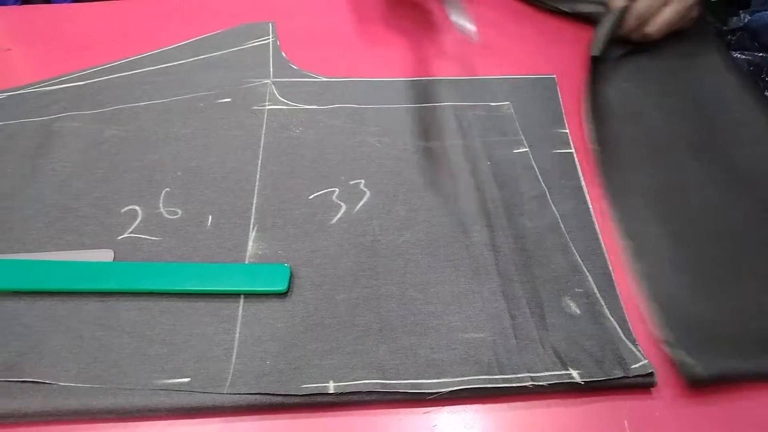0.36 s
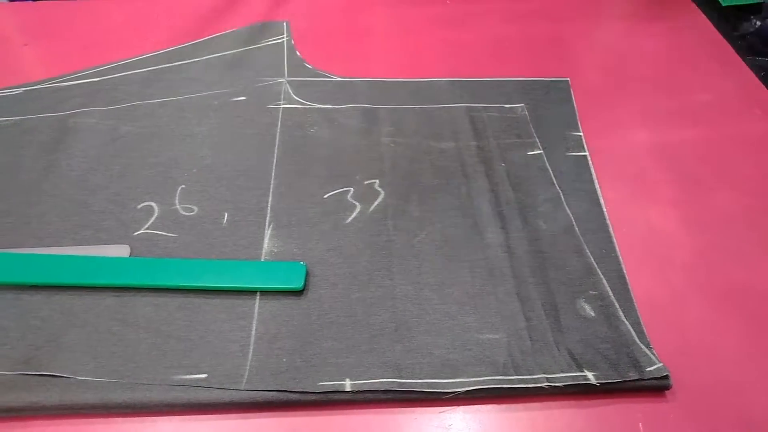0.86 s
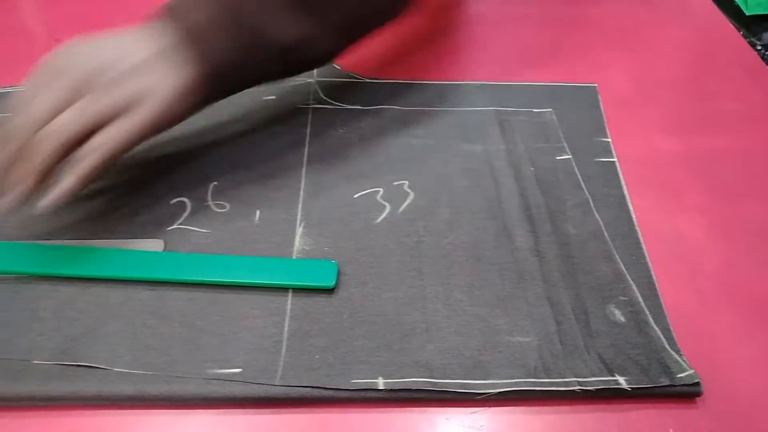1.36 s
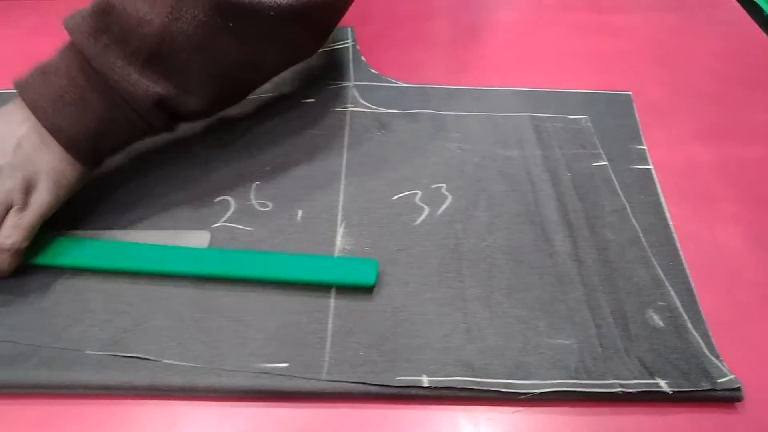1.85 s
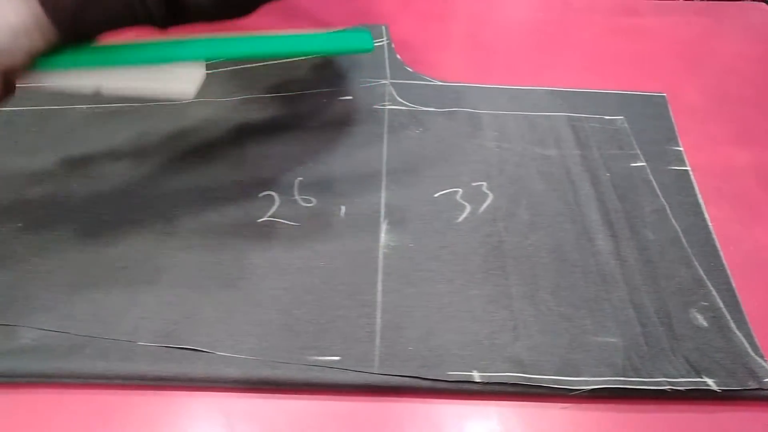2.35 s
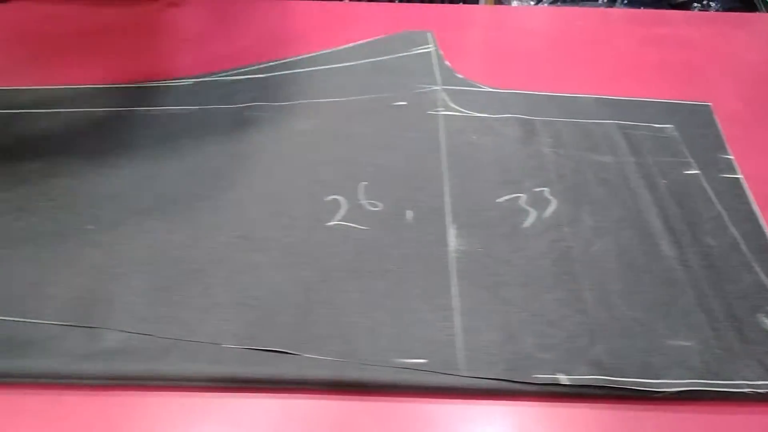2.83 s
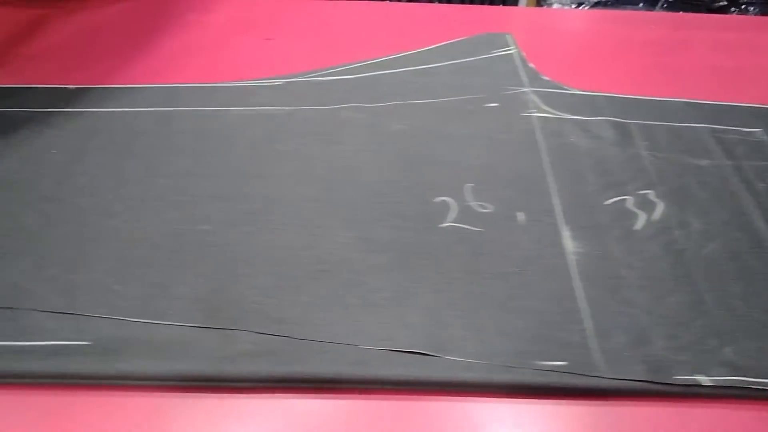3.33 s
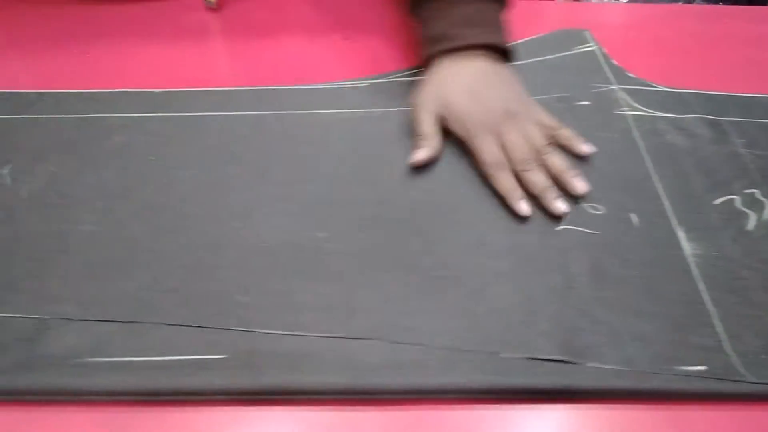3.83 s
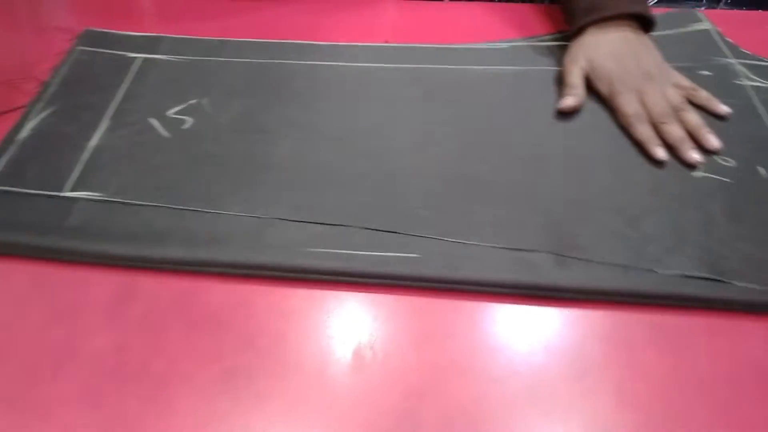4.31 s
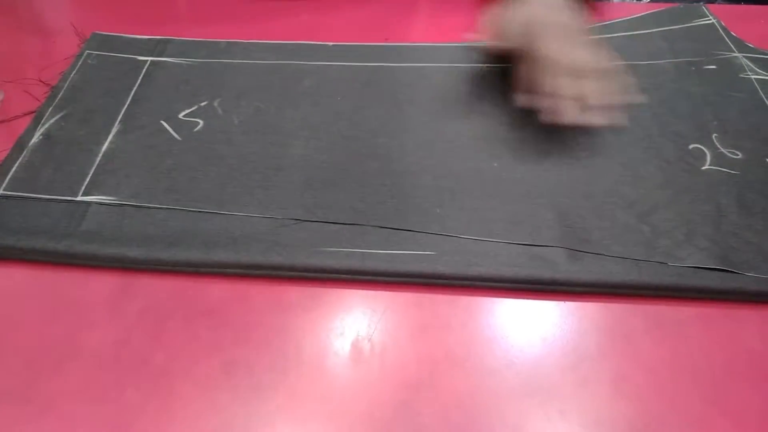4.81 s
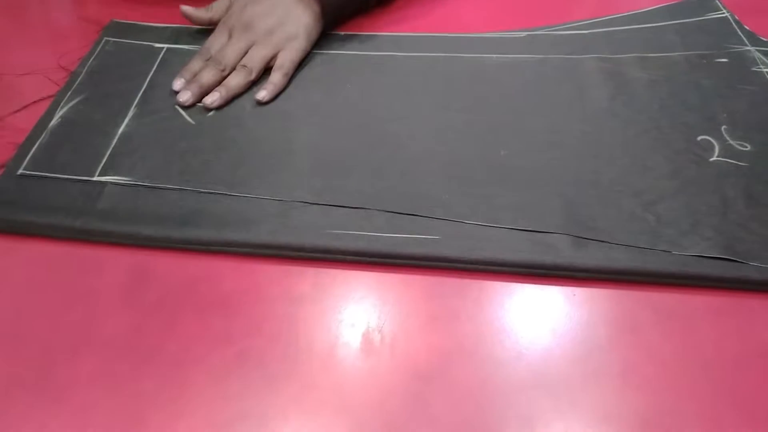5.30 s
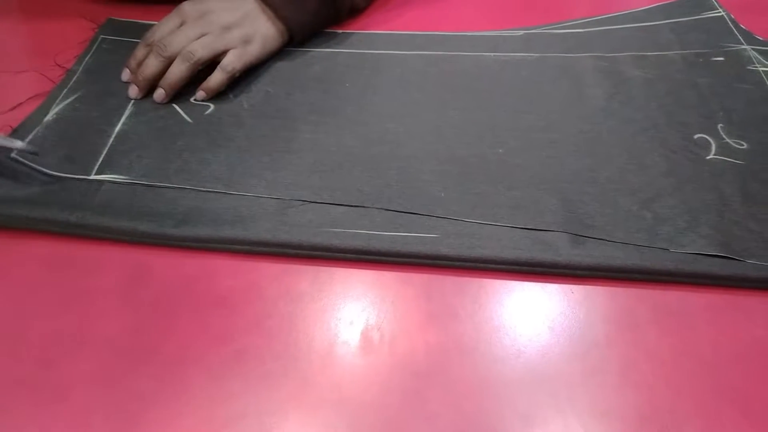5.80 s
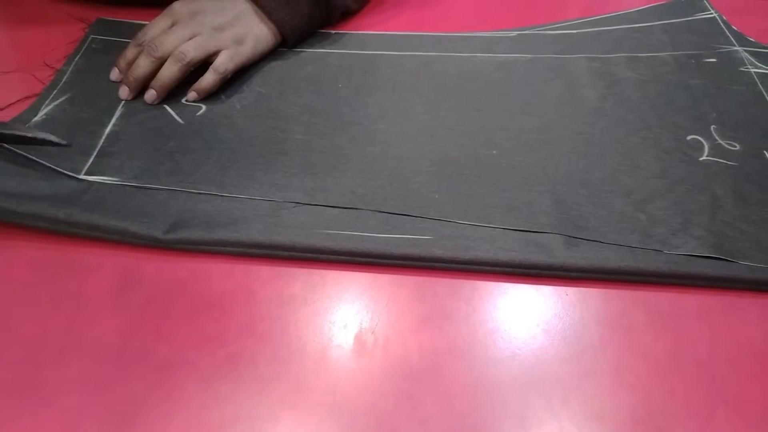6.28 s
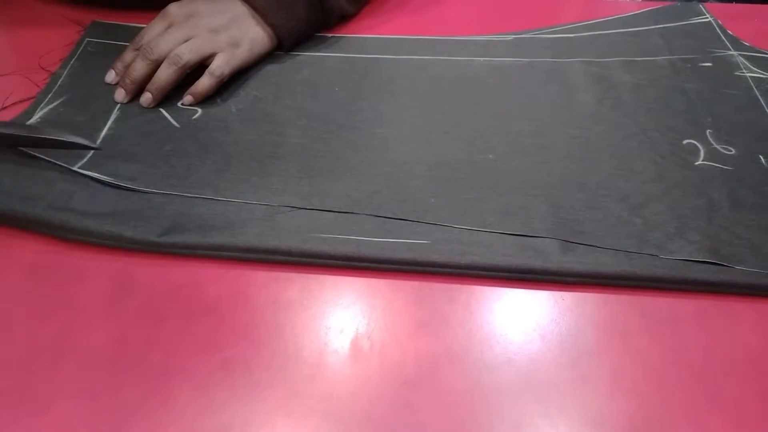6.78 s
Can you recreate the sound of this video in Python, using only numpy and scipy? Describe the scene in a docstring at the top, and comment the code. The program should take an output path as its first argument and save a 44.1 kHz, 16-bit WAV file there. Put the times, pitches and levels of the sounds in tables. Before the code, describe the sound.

A close, dry stereo scene at a tailor's table in a quiet small room. At 0 s a short grind of shears ends with a light knock. Cloth slides away in a soft swish around 0.5 s, with a very faint falling squeak near 0.8. Bright rustles and flicks run from 1.0 to 1.8. Around 2.0-2.2 a plastic ruler clacks and scrapes over the weave, with sharp ticks at 2.4 and 2.55. From 3.1 to 3.5 it drops with hollow, woody knocks and a quick scrape. A hand smooths cloth around 4 s, a soft pat and faint brushing following until 5.2. At 5.57 heavy shears thump down, steel ringing briefly, and crunch to about 6.1. A strong bite peaks at 6.5, a weaker one follows at 6.7, and another grows from 7.0 to the end, with low table thuds.

```python
"""A short grind of shears and a knock on a cutting table open the scene; then an offcut slides away over cloth.
A plastic ruler and chalk tick, drag and drop, a hand smooths and pats the cloth, and heavy shears bite through it.
Blows ring table modes under bursts of noise; the shears are random slips driving table and steel resonances.
Cloth is swelling banded noise. A faint squeak, a rumbling frame, a short room tail and room tone complete it."""
import sys
import numpy as np
from scipy import signal
from scipy.fft import rfft, irfft, next_fast_len
from scipy.io import wavfile
from scipy.ndimage import uniform_filter1d

SR = 44100
rng = np.random.default_rng(int(sys.argv[2]) if len(sys.argv) > 2 else 0)


def wav_out(sig):
    """Save sig, one row per channel (or a flat mono array), as 16-bit PCM at SR to the path in sys.argv[1]."""
    wavfile.write(sys.argv[1], SR, np.round(np.clip(np.atleast_2d(sig).T, -1, 1) * 32767).astype(np.int16))


def gain_from_db(level_db):
    """Turn a decibel level (scalar or array-like) into a linear amplitude factor."""
    decades = np.asarray(level_db, float) / 20
    return 10 ** decades


N = 315315   # samples in the scene


def rms_one(x):
    """Scales to unit rms."""
    return x / np.sqrt(np.mean(x ** 2) + 1e-20)


def in_time(rows):
    """Interpolates each column after the first to one value per sample."""
    s, *columns = np.transpose(rows)
    return [np.interp(np.arange(N) / SR, s, column) for column in columns]


def at_hz(points, hz):
    """Reads a spectrum on a log-frequency axis."""
    return np.interp(np.log(hz), np.log(np.array(points)[:, 0] + 1), np.array(points)[:, 1])


def drift(rate):
    """Slow random wander of unit spread; a higher rate wanders faster."""
    r = np.exp(-80 * np.pi * rate / SR)   # computed at every 40th sample
    slow = signal.lfilter([1], [1, -2 * r, r * r], rng.standard_normal(N // 40 + 2002))[2000:]
    return np.interp(np.arange(N) / 40, np.arange(len(slow)), rms_one(slow))


def ring(clicks, hz, t60):
    """A two-pole resonator: a unit click sets a dying sine of height 1 ringing."""
    r, w = gain_from_db(-60 / (t60 * SR)), 2 * np.pi * hz / SR
    return signal.lfilter([0, np.sin(w)], [1, -2 * r * np.cos(w), r * r], clicks + 1e-18)


def struck(at, level_db):
    """One click per blow at the given samples."""
    clicks = np.zeros(N)
    clicks[at] = gain_from_db(level_db)
    return clicks


def dying(at, level_db, t60):
    """A burst of exponentially dying noise per blow."""
    envelope = signal.lfilter([1], [1, -gain_from_db(-60 / (t60 * SR))], struck(at, level_db) + 1e-18)
    return envelope * rng.standard_normal(N)


def grains(per_s, spread_db):
    """Random slips of uneven size and sign."""
    sizes = gain_from_db(spread_db * np.minimum(rng.exponential(1, N), 5)) * rng.choice([-1, 1], N)
    return sizes * (rng.random(N) < per_s / SR)


def band(x, low_hz, high_hz):
    """Band-pass."""
    return signal.sosfilt(signal.butter(2, [low_hz, high_hz], "band", fs=SR, output="sos"), x)


def bright(x):
    """Treble only; the ports favour 8 kHz."""
    x = band(x, 5530, 11460)
    return 1.027 * x + 0.23 * ring(x, 8260, 0.0017)


def colour(x, gain_at):
    """Multiplies the spectrum by a function of Hz."""
    size = next_fast_len(N + 4096, real=True) * 2
    return irfft(rfft(x, size) * gain_at(np.arange(1, size // 2 + 2) * SR / size), size)[..., :N]


def sides(pan_db):
    """Left and right gains for a left-over-right difference in dB."""
    return gain_from_db(np.array([pan_db / 2, -pan_db / 2]))


def while_on(tables):
    """Joins level tables into curves that are silent between them."""
    t = np.arange(N) / SR
    on = sum((t >= rows[0][0]) & (t <= rows[-1][0]) for rows in tables) > 0
    gate = np.abs(uniform_filter1d(on * 1., size=200))
    return [gain_from_db(level_db) * gate for level_db in in_time(sum(tables, []))]


SWELL_DB = 20           # rise of a sliding stroke over its rise time
STOP_DB_PER_S = 601.5   # extra fade once a stroke has lasted its time


def strokes(rows):
    """Summed level in dB of sliding strokes that swell, fade and stop."""
    t, power = np.arange(0, N + 16, 16) / SR, 1e-12   # computed at every 16th sample
    for peak_s, rise_s, peak_db, fade, lasts_s in rows:
        age = t - peak_s
        swelling_db = -SWELL_DB * age / rise_s
        fading_db = fade * age + STOP_DB_PER_S * np.maximum(age - lasts_s, 0)
        loss_db = np.where(age < 0, swelling_db, fading_db)
        power = power + gain_from_db(2 * (peak_db - np.minimum(loss_db, 200)))
    return np.interp(np.arange(N) / SR, t, 10 * np.log10(power))


# likeness of left and right in stereo noise: (frequency [Hz], likeness [-1 to 1])
SIDE_LIKENESS = [(60, 0.44), (240, 0.86), (950, 0.27), (3760, -0.066), (14900, -0.13)]


def banded_noise(spectrum, patchy_db):
    """Third-octave bands of stereo noise, each with its own level, flicker and likeness; rms 1."""
    low_hz, high_hz = spectrum[0][0], min(spectrum[-1][0], .45 * SR)
    together = drift(19.0)
    edges = np.geomspace(low_hz, high_hz, int(3 * np.log2(high_hz / low_hz)) + 2)
    white = rng.standard_normal((2, 2, N))   # neighbouring bands get unrelated noise
    out = 0
    for k, (low, high) in enumerate(zip(edges, edges[1:])):
        mid, side = band(white[k % 2], low, high)
        hz = np.sqrt(low * high)
        alike = np.clip(at_hz(SIDE_LIKENESS, hz), -1, 1)
        flicker_db = patchy_db * (0.68 * together + 0.77 * drift(4.7))
        gain = gain_from_db(at_hz(spectrum, hz) + flicker_db)
        out = out + gain * (np.sqrt(1 + alike) * mid + np.sqrt(1 - alike) * side * [[1], [-1]])
    return rms_one(out)


# pressure of the shears, one list per bite, as the grind in the table: (time [s], level [dB])
BITES = [
    [(0.0, -27), (0.02, -36.5), (0.08, -53.5), (0.125, -82), (0.2, -96)],
    [(5.59, -26), (5.602, -39), (5.724, -34), (5.808, -35.5), (5.84, -42.5), (5.94, -49), (6.034, -52),
     (6.068, -45.5), (6.2, -58.5), (6.3, -74)],
    [(6.3, -55.5), (6.342, -62), (6.432, -36.5), (6.468, -28.5), (6.518, -22.5), (6.554, -34), (6.598, -57),
     (6.644, -65)],
    [(6.66, -65), (6.69, -42), (6.712, -37.5), (6.74, -40.5), (6.85, -46.5), (6.948, -71)],
    [(6.948, -72), (6.982, -49), (6.997, -47), (7.003, -40.5), (7.019, -41.5), (7.024, -32), (7.03, -32),
     (7.046, -35.5), (7.052, -31.5), (7.126, -27), (7.15, -30)],
]
# tone of each bite: (rasp offset [dB], crunch offset [dB])
BITE_TONE = [(6.5, 11.5), (-3.5, 1), (-0.5, 0.9), (.1, 2), (2.5, 3)]
# table and shears resonances: (frequency [Hz], nominal width [Hz], relative level [dB])
SHEARS_MODES = [(141, 11.8, 1.5), (214.4, 12, -1), (244, 52, 0), (321, 182, -5.5), (427, 39, -6.5),
                (615, 55, -24), (742, 42, -8.5), (870, 87, -12.5), (994, 39, -3), (1050, 120, -10)]
# colour of parting threads: (frequency [Hz], relative level [dB])
CRUNCH_SPECTRUM = [(760, -19), (1300, -6), (1760, -10.5), (2410, -1.5), (2860, -11.5), (4640, -7.5),
                   (5670, -8.5), (6150, -4.5), (8240, -2.5), (9590, -10), (11200, -20), (13600, -12),
                   (14500, -8)]
# high resonances of the steel blades: (frequency [Hz], width before broadening [Hz], relative level [dB])
BLADE_MODES = [(2280, 24, 5), (4100, 13, -2.5), (4400, 22, -3), (5030, 140, -3), (5820, 24, 1),
               (7670, 23, 7), (10960, 26, -1), (11300, 75, 6), (12260, 47, -6)]
BLADE_FROM_HZ = 550   # modes from here up belong to the blades
RASP_DB = -6          # blade rasp relative to the grind, before each bite's offset
CRUNCH_DB, CRUNCH_FOLLOWS = -48.5, 0.9   # crunch at a grind of -39 dB before the offset; its power law


def shears():
    """Threads part in dense uneven slips that drive table and blades, with a fine crunch on top."""
    grind, edge, share = while_on([[(*row, *tone) for row in bite] for bite, tone in zip(BITES, BITE_TONE)])
    rasp = edge * grind * gain_from_db(RASP_DB)
    crunch = share * gain_from_db(CRUNCH_DB) * (grind / gain_from_db(-39)) ** CRUNCH_FOLLOWS

    slips = grains(1600 * gain_from_db(2.5 * drift(28)), 2.23)
    modes = [(hz, gain_from_db(level_db) * width * ring(slips, hz, 1.67 / width) * (-1) ** k)
             for k, (hz, width, level_db) in enumerate(SHEARS_MODES)]
    low = rms_one(sum(mode for hz, mode in modes if hz < BLADE_FROM_HZ))
    high = rms_one(sum(mode for hz, mode in modes if hz >= BLADE_FROM_HZ))

    shared_slips = grains(4000, 3.)
    side_slips = np.array([grains(7000, 3.3), grains(7000, 3.3)])
    threads = gain_from_db(2.0 * drift(45)) * (shared_slips + 1.1 * side_slips)
    fine = rms_one(colour(threads, lambda hz: gain_from_db(at_hz(CRUNCH_SPECTRUM, hz))))
    # each blade resonance comes and goes as the bite travels along the edge
    steel = sum(gain_from_db(level_db + 6 * drift(18)) * ring(threads, hz, 2.2 / (width + 130))
                for hz, width, level_db in BLADE_MODES)
    fine = rms_one(fine + .45 * rms_one(steel))
    return grind * low + rasp * high + landings(), crunch * fine * sides(-1.5)[:, None]


SHEARS_DOWN_S = 5.5   # knocks after this are the shears meeting the table
LANDING_DB = 11       # blade excitation relative to a knock's clack


def landings():
    """The blades ring when the shears knock on the table."""
    clicks = np.zeros(N)
    for s, _, _, _, clack_db, _ in KNOCKS:
        clicks[int(s * SR)] = gain_from_db(clack_db + LANDING_DB) * (s > SHEARS_DOWN_S)
    return sum(gain_from_db(level_db) * ring(clicks, hz, 0.94 / width)
               for hz, width, level_db in SHEARS_MODES if hz >= BLADE_FROM_HZ)


# modes of the table top: (frequency [Hz], relative level [dB], t60 [s])
TABLE_MODES = [(57.3, -24.5, 0.31), (111.8, -22, 0.2), (145.7, -11.5, 0.17), (193.7, -18, 0.16),
               (290, 1, 0.13), (362.3, 0, 0.16), (510.4, -2.5, 0.082)]
# modes that the struck spot favours or damps, one per table mode: (weight [-1 to 1])
SPOT_SHAPE = [0, 0, -1, 1, -1, 1, 0]
KNOCK_FROM_HZ = 220   # modes below follow the boom level, the others the knock level


def table_thud(at, boom_db, knock_db, spot_db):
    """Each blow rings the low table modes, some more than others according to the spot."""
    scatter_db = rng.standard_normal((len(at), len(TABLE_MODES)))
    thud = 0
    for k, (hz, level_db, t60) in enumerate(TABLE_MODES):
        blow_db = boom_db + 4 if hz < KNOCK_FROM_HZ else knock_db - 3
        clicks = struck(at, blow_db + level_db + SPOT_SHAPE[k] * spot_db + scatter_db[:, k])
        thud = thud + ring(clicks, hz, t60) * (-1) ** k
    thud -= ring(struck(at, knock_db + 4.0), 434, 0.01)   # the first push of the contact
    return band(thud, 47, 680)   # cloth under the blow softens the contact


def table_knock(at, knock_db, clack_db):
    """The crowded upper table modes blur into dying noise."""
    noise = dying(at, np.minimum(knock_db, clack_db + 3.5) + 11, 0.06)
    return band(band(noise, 600, 2200), 450, 1750)


# broad resonances of the plastic ruler, also used by drags(): (frequency [Hz], relative level [dB], nominal t60 [s])
RULER_MODES = [(546, -45, 0.0476), (2175, -4, 0.0047), (2280, -5, 0.004), (2880, 5, 0.0021),
               (4320, -38, 0.0048)]
# held in the air the ruler rings on after a tick: (frequency [Hz], level over the clack [dB], t60 [s])
RULER_BENDING = (575, -4, .11)


def ruler_clack(at, clack_db):
    """A rattle of dying noise excites the ruler resonances; ticks also ring its bending mode."""
    rattle = dying(at, clack_db - 11.5, 0.036)
    clack = sum(gain_from_db(level_db) * ring(rattle, hz, t60) for hz, level_db, t60 in RULER_MODES)
    clack = clack + band(dying(at, clack_db + 5, .05), 1000, 5000)
    hz, level_db, t60 = RULER_BENDING
    is_tick = np.arange(len(at)) < len(TICKS)   # ticks come first in the list of blows
    return clack + ring(struck(at, np.where(is_tick, clack_db + level_db, -200)), hz, t60)


def slap_hiss(at, hiss_db, hiss_t60):
    """A stereo hiss fades after each blow; the slap spreads after the snap."""
    level = np.zeros((2, N))
    for i, level_db, t60 in zip(at, hiss_db, np.clip(hiss_t60, .01, .3)):
        age = np.arange(min(N - i, SR // 3)) / SR
        level[:, i:i + len(age)] += gain_from_db(level_db - 60 * age / t60) * (1 - .9 * np.exp(-age / 0.003))
    return bright(level * rng.standard_normal((2, N)))


# light ticks of ruler, chalk and fingertips, too weak to move the table much; levels are nominal:
# (time [s], crack [dB], clack [dB], hiss relative to crack [dB], hiss t60 [s])
TICKS = [(1.2262, -17.5, -53, -3.5, 0.12), (1.8952, -33, -66, -11, 0.04), (2.4193, -1, -28, -8.5, 0.054),
         (2.5584, -6, -53, -14, 0.037), (3.141, -26, -60, -3, 0.11), (4.6724, -15.5, -51, -5, 0.077),
         (5.4067, -44, -75, -7, 0.046)]
# knocks that ring the table, also used by landings() and rumble(); levels are nominal:
# (time [s], crack [dB], boom [dB], knock [dB], clack [dB], spot [dB])
KNOCKS = [(.003, -24, -24.5, -30.5, -32, -3), (2.0172, -26, -29.5, -62, -36, 4),
          (2.1011, -10.5, -18, -64, -21, 5), (2.1054, -10.5, -25, -44, -20.5, 3),
          (2.1217, -30, -25, -43, -25, 8), (2.1475, -19.5, -20.5, -39, -20, 9),
          (2.197, -25, -24, -53, -27.5, 5), (3.1108, -31, -14, -13, -22, -5.5),
          (3.1217, -26, -11, -21.5, -45, -8.5), (3.2854, -6, -9, -13.5, -21, 3.5),
          (3.3024, -19, -46, -26, -46, -1), (3.3871, -42, -19, -20.5, -33.5, -3),
          (3.4633, -30, -50, -27, -28, 9), (3.474, -2, -19, -27.5, -28, -2),
          (3.4897, -3.5, -10, -20.5, -21.5, 2.5), (3.909, -32, -25, -48, -53.5, 2),
          (5.2079, -57, -25, -46, -67, -0.3), (5.5694, -29, -10, -17, -23.5, -0.4),
          (6.6649, -60, -21.5, -28.5, -70, -1), (7.0218, -53, -12, -28.5, -49, -0.5),
          (7.0473, -31, -54, -42, -55, -3)]
TICK_TABLE_DB = -57.5   # boom and knock of a tick relative to its crack
KNOCK_HISS_DB, KNOCK_HISS_T60_S = -6, 0.076   # hiss after a knock: nominal level relative to its crack, t60


def blows():
    """Ticks and knocks: a bright crack leads the table, the ruler's clack and a hiss."""
    rows = [(s, crack, crack + TICK_TABLE_DB, crack + TICK_TABLE_DB, clack, 0, *hiss)
            for s, crack, clack, *hiss in TICKS]
    rows += [(*row, KNOCK_HISS_DB, KNOCK_HISS_T60_S) for row in KNOCKS]
    s, crack_db, boom_db, knock_db, clack_db, spot_db, hiss_db, hiss_t60 = np.transpose(rows)
    at = np.round(s * SR).astype(int)
    thud = table_thud(at, boom_db, knock_db, spot_db)
    knock = table_knock(at, knock_db, clack_db)
    clack = ruler_clack(at, clack_db)
    crack = dying(at, crack_db + 6, .003) + struck(at, crack_db + 7)
    crack = bright(crack) + 0.089 * band(crack, 1750, 7600)
    return thud + knock + clack + crack, slap_hiss(at, crack_db + hiss_db, hiss_t60)


# the ruler dragged over the cloth:
# (peak time [s], rise [s], hiss peak level [dB], fade [dB/s], time before the stop [s])
DRAGS = [(2.075, 0.042, -24, 62, 0.018), (2.748, 0.017, -36, 151, 0.064), (3.485, .008, -18, 283, 0.069)]
DRAG_RASP_DB = -9   # ruler resonances relative to the hiss


def drags():
    """The ruler's edge skips over the weave, exciting its resonances and a hiss."""
    hiss = gain_from_db(strokes(DRAGS))
    rasp = hiss * gain_from_db(DRAG_RASP_DB)
    slips = grains(4400, 2.15)
    body = sum(gain_from_db(level_db) * ring(slips, hz, t60 / 2) for hz, level_db, t60 in RULER_MODES[1:])
    return rasp * rms_one(body), hiss * rms_one(bright(rng.standard_normal((2, N))))


# cloth and sleeve sliding:
# (peak time [s], rise [s], swish peak level [dB], fade [dB/s], time before the stop [s])
SWEEPS = [(.5, .2, -39.5, 20, 0.45), (1.048, .1, -35.5, 112, 0.064), (1.16, .1, -53, 5, 0.076),
          (1.245, 0.054, -36, 48, 0.94), (1.78, .03, -56.5, -6, 0.206), (2.072, .076, -40, 97, 0.17),
          (2.264, .15, -39.5, 109, 0.11), (2.41, .012, -41, 77, 0.25), (3.1, .6, -56, 30, 0.11),
          (3.23, .012, -47.5, 13, 0.3), (3.566, .2, -43.5, 100, 0.028), (4.0, .13, -40, 25.5, 0.56),
          (4.655, .2, -47.5, 103, 0.0029), (5.23, .4, -51.5, 37, 0.27)]
# brief flicks of the cloth edge: (peak time [s], swish peak level [dB], fade [dB/s])
FLICKS = [(.991, -40.5, 200), (1.131, -43.5, 500), (1.372, -29, 602), (1.412, -35.5, 900),
          (1.463, -40.5, 450), (1.76, -35, 455), (2.316, -35, 302), (4.906, -40, 445)]
# colour of the bright swish: (frequency [Hz], relative level per Hz [dB])
SWISH_SPECTRUM = [(2060, -55.5), (3500, -19.5), (5260, -11.5), (6800, -1), (7960, 5.5), (11200, -16.5),
                  (13700, -7), (14700, -16), (15000, -63)]
# colour of the duller cloth body: (frequency [Hz], relative level per Hz [dB])
BODY_SPECTRUM = [(290, -42), (500, -10), (1470, -7.5), (1590, -11), (1720, 12), (1890, -5), (2920, -8.5),
                 (5000, -8), (6500, -45), (11000, -120)]
FLICK_RISE_S, IDLE_SWISH_DB = .009, -64
BODY_DB, BODY_FOLLOWS = -52.5, 0.68   # cloth body at a swish of -40.5 dB; share of the swish's swing


def rustle():
    """Fibres catching: bright hiss with fine grain, and a duller body."""
    flicks = [(s, FLICK_RISE_S, db, fade, 1) for s, db, fade in FLICKS]
    swish_db = 10 * np.log10(gain_from_db(2 * strokes(SWEEPS + flicks)) + gain_from_db(2 * IDLE_SWISH_DB))
    body_db = BODY_DB + BODY_FOLLOWS * (swish_db + 40.5)
    grain = gain_from_db(.6 * drift(60))
    swish = banded_noise(SWISH_SPECTRUM, patchy_db=.7)
    body = banded_noise(BODY_SPECTRUM, patchy_db=.9)
    return grain * (gain_from_db(swish_db) * swish + gain_from_db(body_db) * body)


# a faint falling squeak: (time [s], frequency [Hz], level [dB])
SQUEAK = [(.72, 1400, -95), (.74, 1330, -63), (.79, 1130, -63), (.83, 880, -61), (.855, 840, -95)]


def squeak():
    """A short slipping tone with its octave, its pitch wavering slightly."""
    hz, level_db = in_time(SQUEAK)
    phase = 2 * np.pi * np.cumsum(hz * (1 + .004 * drift(40))) / SR
    return gain_from_db(level_db) * (np.sin(phase) + .95 * np.sin(2 * phase))


# the table shaken by leaning: (time [s], rumble level [dB])
LEANING = [(0.0, -33.5), (0.18, -65), (0.63, -56.5), (0.99, -56), (1.21, -49), (1.72, -59), (2.03, -51.5),
           (2.2, -42.5), (2.48, -68), (3.1, -57), (4.6, -61), (5.56, -56.5), (6.3, -60.5), (6.5, -37),
           (6.65, -54), (7.15, -58)]
# colour of the shaking frame: (frequency [Hz], relative level per Hz [dB])
RUMBLE_SPECTRUM = [(12, -32.5), (20, -27), (59, 3.5), (192, -7), (229, -12.5), (287, -9), (700, -20),
                   (910, -54), (1540, -120)]
SHUDDER_DB = -20   # shudder peak relative to a knock's boom
SHUDDER_RISE_S, SHUDDER_FADE_DB_PER_S = 0.028, 212.5


def rumble():
    """The frame shakes under leaning and shudders after each knock: low banded noise."""
    shudders = [(s + SHUDDER_RISE_S, SHUDDER_RISE_S, boom_db + SHUDDER_DB, SHUDDER_FADE_DB_PER_S, 1)
                for s, _, boom_db, *_ in KNOCKS]
    level = np.hypot(gain_from_db(in_time(LEANING)[0]), gain_from_db(strokes(shudders)))
    return level * banded_noise(RUMBLE_SPECTRUM, patchy_db=3.5)


ROOM_T60_S = 0.14


def room(x):
    """A short tail of reflections, unlike on each side."""
    t = np.arange(SR // 3) / SR
    echoes = rng.standard_normal((2, len(t))) * gain_from_db(-60 * t / ROOM_T60_S) * (t > .003)
    echoes = band(echoes, 356, 13000)
    return signal.fftconvolve(x[None], echoes / np.sqrt(np.sum(echoes[0] ** 2)), axes=1)[:, :N]


# colour of the quiet room: (frequency [Hz], relative level per Hz [dB])
ROOM_TONE_SPECTRUM = [(12, -14.5), (20, 8), (178, -16), (235, -10.5), (445, -14.5), (587, -21), (1590, -23),
                      (2160, -24.5), (3650, -20.5), (7720, -27), (10200, -28.5), (13800, -29.5),
                      (15000, -43)]
ROOM_TONE_DB = -57.5


def room_tone():
    """Steady background noise with a patchy flicker in each band."""
    return gain_from_db(ROOM_TONE_DB) * banded_noise(ROOM_TONE_SPECTRUM, patchy_db=3.5)


# delay of the left port behind the right: (frequency [Hz], lag [s])
LEFT_LAG = [(100, .00014), (500, .00024), (1200, .00028), (2000, .00038), (15000, .00038)]


def at_ports(x):
    """The left port hears the table a little late, more so in the treble."""
    late = colour(x, lambda hz: np.exp(-2j * np.pi * hz * at_hz(LEFT_LAG, hz)))
    return np.array([late, x])


ROOM_DB = -8   # reflections relative to the direct sound


def scene():
    """Everything on the table, its reflections and the room tone."""
    pointed, spread = map(sum, zip(blows(), drags(), shears()))
    tone = room_tone()
    direct = at_ports(pointed) + spread
    return direct + gain_from_db(ROOM_DB) * room(pointed) + rustle() + rumble() + squeak() + tone


def band_limit(x):
    """A steep low-pass at the top of the band."""
    return signal.sosfilt(signal.butter(12, 15530, fs=SR, output="sos"), x)


# level balance of the two ports: (frequency [Hz], left over right [dB])
PORT_BALANCE = [(300, 0), (1500, -1), (3800, 0), (5500, 3), (8000, 6), (10500, 7), (13500, 11)]
CUTOFF_HZ = 14600   # stopband edge of the low-pass


def record(dry):
    """The left port is brighter in the high treble, the top is cut and peaks clip."""
    ports = colour(dry, lambda hz: sides(at_hz(PORT_BALANCE, hz)))
    cut = signal.sosfilt(signal.cheby2(12, 40, CUTOFF_HZ, fs=SR, output="sos"), ports)
    mix = np.clip(cut, -1, 1)
    return band_limit(mix)


dry = scene()
out = record(dry)
wav_out(out)
```